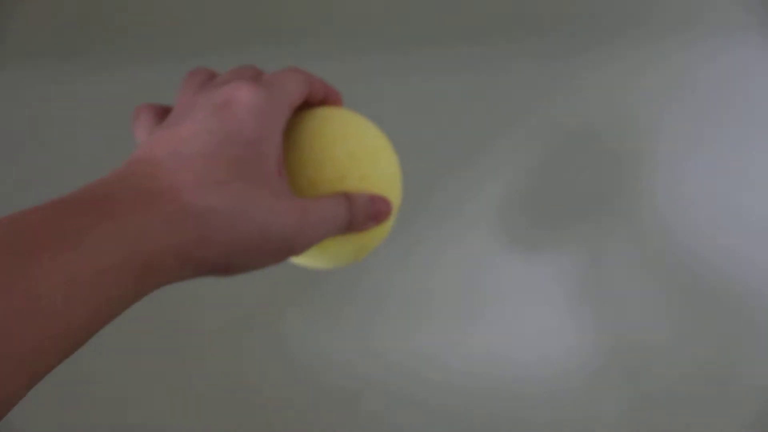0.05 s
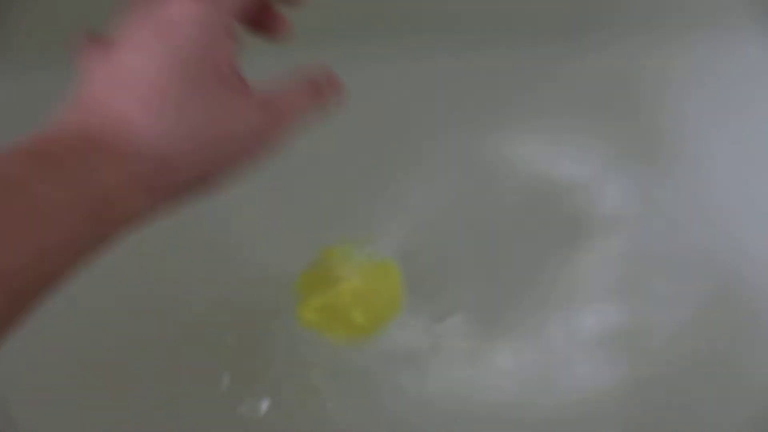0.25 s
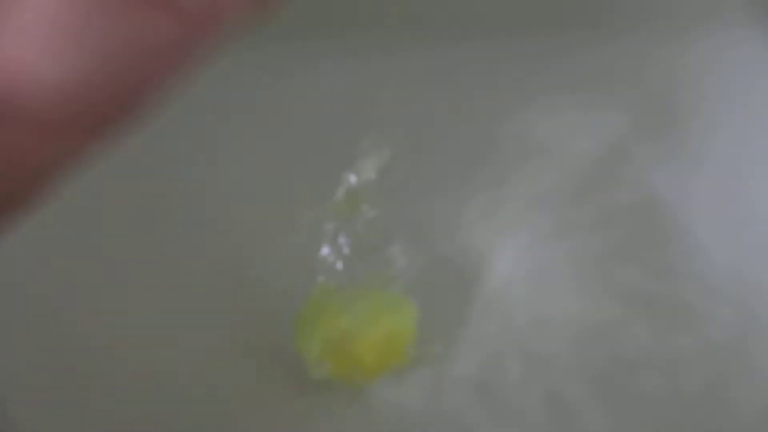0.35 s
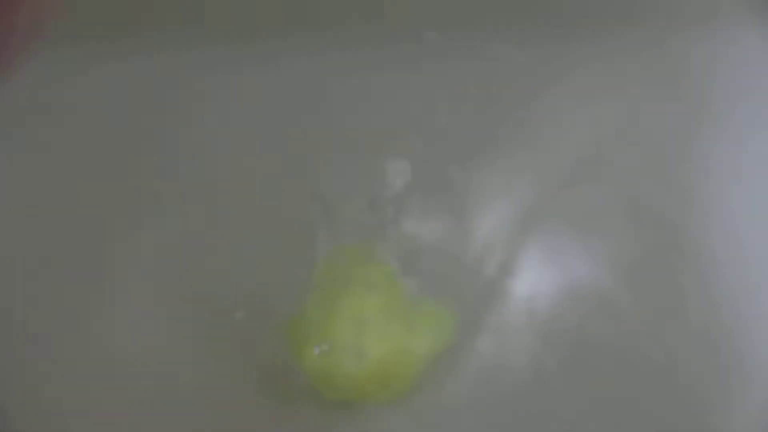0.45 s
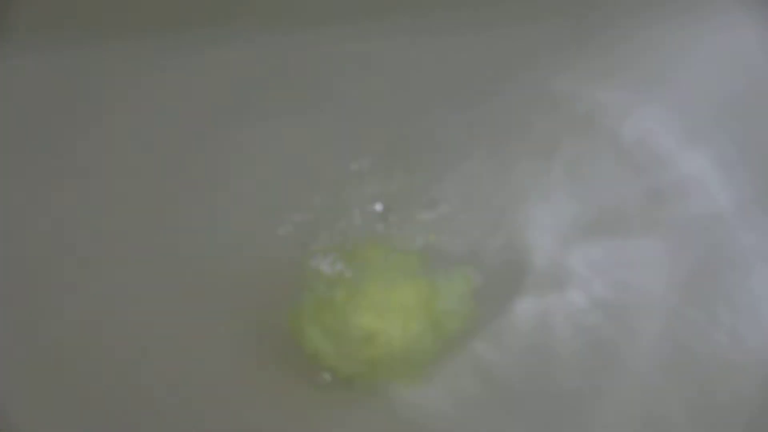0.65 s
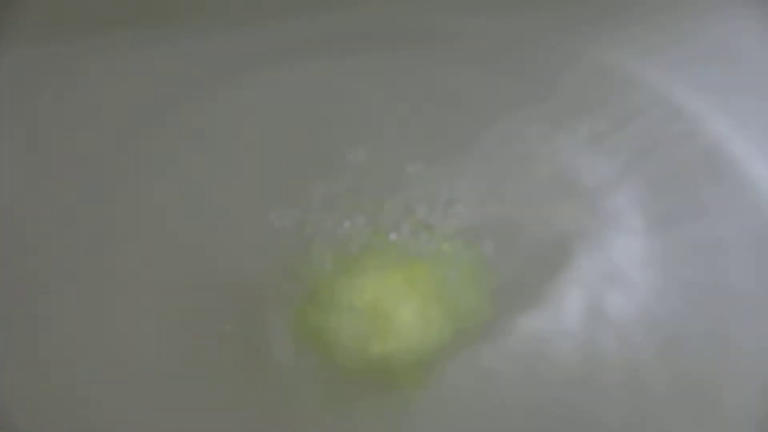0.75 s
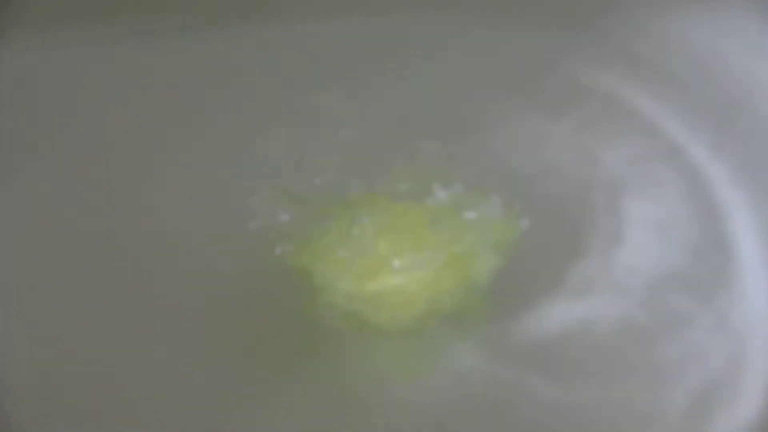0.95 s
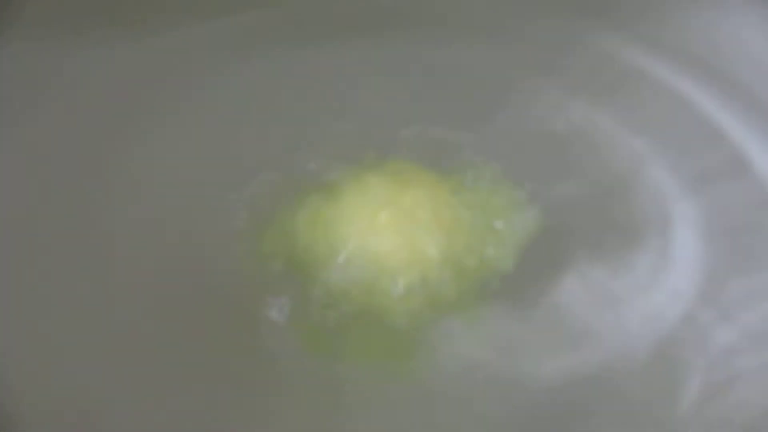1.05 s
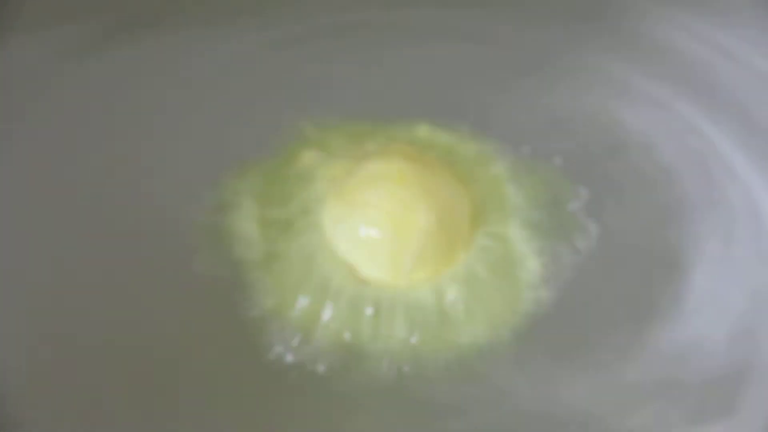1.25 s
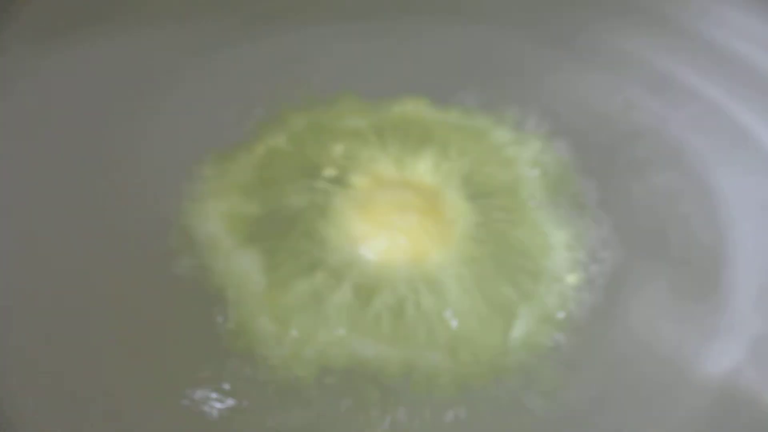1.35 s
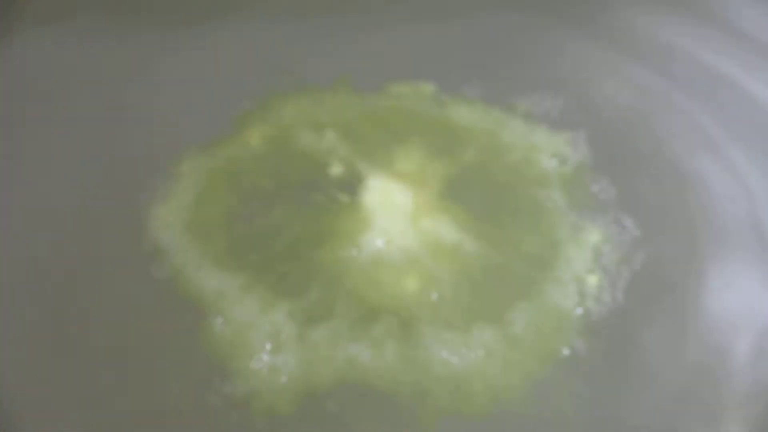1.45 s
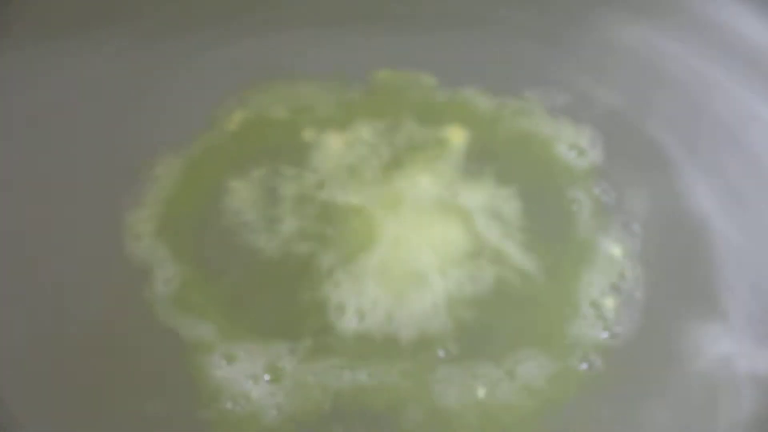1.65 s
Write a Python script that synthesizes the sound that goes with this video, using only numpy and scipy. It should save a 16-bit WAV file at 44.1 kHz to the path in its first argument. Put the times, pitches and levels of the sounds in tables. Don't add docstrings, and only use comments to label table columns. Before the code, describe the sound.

Close up in a tiled bathroom with faint fan hum and hiss, a sharp water slap, a low ringing thud on the tub floor, gurgles and tiny drips, then swelling fizz, snapping bubbles and one loud pop.

```python
import sys
import numpy as np
from scipy import signal
from scipy.fft import rfft, irfft, next_fast_len
from scipy.io import wavfile
from scipy.ndimage import map_coordinates

SR = 44100
rng = np.random.default_rng(int(sys.argv[2]) if len(sys.argv) > 2 else 0)


def level_to_linear(level):
    exponent = np.asarray(level, float) / 20
    return 10 ** exponent


def bounce(signal):
    frames = np.transpose(np.atleast_2d(signal))
    limited = np.clip(frames, -1, 1)
    pcm = np.round(limited * 32767).astype(np.int16)
    wavfile.write(sys.argv[1], SR, pcm)


N = 74970
T = np.arange(N) / SR


def unit(x):
    return x / np.sqrt(np.mean(x ** 2) + 1e-20)


def along(points, hz):
    f, v = np.transpose(points)
    return np.interp(np.log(hz + 1), np.log(f + 1), v)


def filtered(x, response):
    m = next_fast_len(len(x) + 8192)
    spectrum = rfft(x, m) * response(np.fft.rfftfreq(m, 1 / SR))
    return irfft(spectrum, m)[:len(x)]


def noise(colour):
    return unit(filtered(rng.standard_normal(N), lambda f: level_to_linear(along(colour, f))))


def band(hz, octaves):
    return lambda f: np.exp(-.5 * (np.log2((f + 1) / hz) / octaves) ** 2)


def peak(f, hz, width_hz):
    return 1j * f * width_hz / (hz * hz - f * f + 1j * f * width_hz)


def dying(start, t60, rise):
    t = np.maximum(T - start, 0)
    return level_to_linear(-60 * t / t60) * (1 - np.exp(-t / rise))


def add(x, s, sound):
    part = x[round(s * SR):][:len(sound)]
    part += sound[:len(part)]


def wander(width_hz):
    return np.cumsum(rng.standard_normal(N)) * np.sqrt(width_hz / SR)


def room_tone():
    # frequency in Hz, density in dB per Hz.
    hiss_colour = [(30, -4), (60, -1), (150, -2.5), (400, -2.5), (1000, -11), (3000, -14.5), (8000, -19.5),
                   (16000, -22.5)]
    # frequency in Hz, level in dB, width in Hz.
    fan_tones = [
        (58, -59, .5),
        (156, -72, 12),
    ]
    hiss_db = -58.5
    hum = 0
    for hz, db, width_hz in fan_tones:
        hum = hum + level_to_linear(db + 2) * np.sin(2 * np.pi * hz * T + wander(width_hz))
    return level_to_linear(hiss_db) * noise(hiss_colour) + hum


def bathroom(x, db):
    # frequency in Hz, t60 in seconds.
    tile_decay = [(150, 0.54), (800, 0.52), (2500, 0.32), (6000, 0.26), (15000, 0.14)]
    # delay in seconds, level in dB.
    wall_echoes = [(.0011, -19), (.0017, -18), (.0026, -15), (.0031, -17), (.0041, -21), (.0053, -24),
                   (.0063, -21), (.0083, -24), (.0137, -23), (.0153, -22)]
    hz, t, z = signal.stft(rng.standard_normal(SR), SR, nperseg=256)
    decay = level_to_linear(-60 * t / along(tile_decay, hz)[:, None])
    tail = signal.istft(z * decay, SR, nperseg=256)[1]
    tail *= 1 - np.exp(-np.arange(len(tail)) / SR / 0.011)
    tail *= level_to_linear(db) / np.linalg.norm(tail)
    tail[0] = 1
    for s, wall_db in wall_echoes:
        tail[round(s * SR)] += level_to_linear(wall_db)
    return signal.fftconvolve(x, tail)[:N]


def grains(count, hz, spread, cycles, spiky_db):
    r, k = rng.random((count, 2)), np.arange(160)
    f = np.clip(hz * np.exp(spread * rng.standard_normal((count, 1))), 200, 16000) / SR
    size = level_to_linear(-spiky_db * np.log(r[:, 1:] + .09))
    wave = size * np.exp(-k * f / cycles) * np.sin(2 * np.pi * f * k)
    moments = (r[:, :1] * N).astype(int) + k
    return unit(np.bincount(moments.ravel(), wave.ravel(), N + len(k))[:N])


def gushes():
    # start in seconds, swell in seconds, t60 in seconds, level in dB, centre in Hz.
    gush_rows = [(.016, 0.042, 0.23, -42.5, 4480), (0.015, 0.041, 0.16, -39.5, 12200),
                 (.156, 0.032, 0.56, -46, 1550), (.191, 0.022, 0.2, -46.5, 342),
                 (0.236, 0.0036, 0.32, -48.5, 490), (0.644, 0.034, 0.29, -55, 139),
                 (0.386, 0.011, 0.43, -36, 1920), (0.991, 0.041, 0.053, -40.5, 970),
                 (1.005, 0.012, 0.08, -42.5, 8800), (1.061, 0.016, 0.25, -50, 3600),
                 (1.091, 0.045, 0.52, -50.5, 944), (1.137, 0.016, 0.3, -39, 2600),
                 (1.165, 0.031, 0.15, -52.5, 140), (1.422, 0.0022, 0.4, -41, 840),
                 (1.4235, 0.007, 0.14, -36.5, 8000), (1.432, 0.013, 0.3, -50, 126),
                 (1.446, 0.014, 0.13, -36.5, 2620), (1.6, 0.04, 1, -47, 11000)]
    octaves, grain_share = 1, 0.61
    x = 0
    for s, swell, t60, db, hz in gush_rows:
        bubbling = grains(count=2500, hz=hz, spread=0.664, cycles=2.54, spiky_db=4.5)
        wet = rng.standard_normal(N) + grain_share * bubbling
        rise = np.sin(np.clip((T - s) / swell, 0, 1) * np.pi / 2) ** 2
        fall = level_to_linear(db - 60 * np.maximum(T - s - swell, 0) / t60)
        x = x + unit(filtered(wet, band(hz, octaves))) * rise * fall
    return x


def fizz():
    # time in seconds, level in dB.
    fizz_level = [
        (0, -53),
        (.3, -53.5),
        (.6, -66.5),
        (.95, -63),
        (1.0, -53),
        (1.13, -49.5),
        (1.2, -46),
        (1.4, -47),
        (1.55, -45.5),
        (1.7, -57.5),
    ]
    # frequency in Hz, density in dB per Hz.
    fizz_colour = [(500, 3), (1500, -2), (3000, -0.5), (4800, 3), (8000, -1.5), (13000, -2), (16000, -3)]
    bubbling = grains(count=5000, hz=6480, spread=0.453, cycles=1.9, spiky_db=5.0)
    hiss = unit(noise(fizz_colour) + .5 * bubbling)
    return hiss * level_to_linear(np.interp(T, *np.transpose(fizz_level)))


def bubbles():
    # start in seconds, peak in dB, pitch in Hz, life in cycles.
    bubble_rows = [(0.1766, -33, 2460, 10), (.1845, -34.5, 2493, 35), (.204, -30, 910, 10),
                   (0.2045, -33, 5700, 25), (0.224, -28, 1450, 5.4), (.2354, -0.5, 12600, 8),
                   (.2354, -33, 7500, 3.5), (1.1345, -15, 15100, 17), (1.4237, -20.5, 470, 1.5),
                   (0.693, -40.5, 6800, 22), (.715, -41.5, 4800, 9.9), (.76, -34, 5260, 10.8),
                   (.905, -39, 4200, 9.2), (0.9542, -43, 5800, 13), (1.009, -27.5, 5200, 5.7),
                   (1.026, -32, 6000, 5.2), (1.0345, -30, 504, 2.2), (1.02, -37, 650, 3.5),
                   (1.075, -46, 2160, 20), (1.0744, -39, 2820, 26), (1.083, -38, 4700, 13),
                   (1.1415, -32, 2310, 19), (1.161, -21.5, 5430, 17.3), (1.165, -27, 1480, 5.1),
                   (1.202, -23.5, 3500, 4.5), (1.424, 4, 4420, 5.5), (1.454, -25.5, 2540, 15),
                   (1.692, -44.5, 1920, 57)]
    rise, rise_hz = .05, 2000
    x, t = np.zeros(N), T[:SR // 10]
    for s, db, hz, cycles in bubble_rows:
        u = t * hz / cycles
        swell = 1.94 * level_to_linear(db - 38.0 * u ** 1.19) * (1 - np.exp(-t * hz * 0.93))
        bend = 1 + rise * (rise_hz / max(hz, rise_hz / 2)) ** 2 * np.minimum(u, 1) / 2
        add(x, s, swell * np.sin(2 * np.pi * hz * t * bend))
    return x


def snaps():
    # start in seconds, peak in
    # dB, centre in Hz, burst in seconds.
    snap_rows = [(0.16, -61, 9000, .003), (.1845, -50, 9000, .002), (.2, -36, 12000, 0.0026),
                 (.633, -45.5, 8500, 0.0035), (.639, -44, 14000, .004), (.692, -42, 9800, 0.0064),
                 (.713, -42, 11760, 0.0018), (.802, -46, 14000, 0.0032), (.855, -49, 13900, 0.004),
                 (0.937, -44.5, 9800, .003), (0.952, -37.5, 7650, .002), (.989, -45.5, 5930, 0.0016),
                 (.9925, -36, 11000, 0.0015), (.992, -41.5, 1010, 0.011), (1.018, -33, 10900, 0.0025),
                 (1.037, -48, 10500, .002), (1.1012, -30, 9000, 0.0032), (1.1343, -22, 14200, 0.0053),
                 (1.202, -31, 12000, .002), (1.275, -28, 13000, .002), (1.424, -15.5, 8980, 0.0069),
                 (1.546, -38, 11100, 0.0018), (1.461, -23, 5050, .004), (0.3772, -14.5, 9300, 0.0032)]
    octaves, lead = 0.4, 44
    x, t = np.zeros(N), T[:SR // 10]
    for s, db, hz, length in snap_rows:
        burst = rng.standard_normal(len(t)) * level_to_linear(-25 * t / length)
        burst[0] = 2.06
        burst = filtered(np.pad(burst, (lead, 0)), band(hz, octaves))
        add(x, s - lead / SR, level_to_linear(db) * burst / np.abs(burst).max())
    return x


def pockets(rows):
    softness, rough_db = 0.68, 2.5
    x = np.zeros(N)
    for s, length, db, start_hz, end_hz in rows:
        t = T[:round(length * SR)]
        flutter_db = rough_db * map_coordinates(rng.standard_normal(12), [t / length * 8])
        swell = level_to_linear(db + flutter_db) * np.abs(np.sin(np.pi * t / length)) ** softness
        glide_hz = start_hz + (end_hz - start_hz) * t / length / 2
        add(x, s, swell * np.sin(2 * np.pi * t * glide_hz))
    return x


def drips():
    # start in seconds, length in seconds, peak in dB, first pitch in Hz, last pitch in Hz.
    drip_rows = [(.177, .007, -40, 2480, 2480), (.188, .025, -42, 2500, 2480),
                 (.237, .004, -27, 3800, 6500), (.659, .01, -58, 3300, 2900), (.745, .04, -61, 1100, 1700),
                 (.858, .018, -43, 1180, 1530), (.859, .012, -51, 2250, 2400),
                 (.874, .028, -53, 2400, 2330), (.877, .008, -47, 1450, 1330),
                 (.883, .014, -52, 1750, 2050), (.887, .006, -48, 1450, 1550),
                 (.894, .008, -47, 1300, 1520), (.992, .008, -46, 950, 1100),
                 (1.037, .009, -44, 1250, 1300), (1.142, .006, -42, 3300, 3400),
                 (1.154, .006, -39, 2700, 2900), (1.1605, .005, -31, 7200, 6800),
                 (1.161, .007, -36, 3900, 4000), (1.162, .007, -38, 2900, 2700),
                 (1.187, .006, -42, 1100, 1200), (1.437, .004, -22, 4800, 4900)]
    return bathroom(pockets(drip_rows), db=-12.5)


def gulps():
    # start in seconds, length in seconds, peak in dB, first pitch in Hz, last pitch in Hz.
    gulp_rows = [(.392, .04, -20.5, 266, 274), (.394, 0.025, -20.5, 395, 368), (.41, 0.015, -22, 480, 493),
                 (.432, .017, -16.5, 402, 452), (.444, 0.021, -22.5, 360, 343),
                 (.464, 0.019, -19.5, 369, 390), (.458, .028, -29, 169, 165), (.498, 0.039, -31, 180, 169),
                 (.498, .012, -24, 328, 310), (.51, 0.025, -26.5, 348, 390), (.549, .014, -28, 380, 358),
                 (.556, 0.033, -35, 159.6, 160), (.57, 0.016, -31, 323, 343), (.622, .03, -43, 250, 337),
                 (.642, .066, -41, 125.6, 176.6), (.66, 0.019, -44.5, 343, 323),
                 (.7, .016, -48.5, 313, 300), (.722, 0.022, -46, 166, 170), (.81, 0.042, -52.5, 105, 110),
                 (.935, 0.037, -50.5, 159, 165), (1.031, .0065, -33, 696, 470), (.378, 0.031, -29, 97, 81),
                 (.3795, 0.013, -18.5, 858, 800)]
    return pockets(gulp_rows)


def slap():
    # frequency in Hz, density in dB per Hz.
    slap_colour = [(150, -15), (400, -13.5), (1500, -4), (3500, -3.5), (7500, -2), (10000, -7.5),
                   (12500, -15), (16000, -5)]
    start, crack_db, crack_t60 = .2352, -1, 0.015
    spray_db, spray_t60 = -12, 0.024
    x = level_to_linear(spray_db) * dying(start, spray_t60, 0.00014) * rng.standard_normal(N)
    cracks = start + np.array([0, .00012, .0003, .0004, .00055])
    strength = level_to_linear(crack_db - 60 * (cracks - start) / crack_t60)
    x[np.round(cracks * SR).astype(int)] += strength * [1, -1, 1, -1, 1]
    return filtered(x, lambda f: level_to_linear(along(slap_colour, f)))


KNOCK_S = .3797


def shell():
    # frequency in Hz, level in dB, t60 in seconds.
    shell_modes = [(106.3, -21, 0.58), (165, -11, 0.61), (269.8, -6.5, 0.5), (346.3, -5, 0.46),
                   (394, -7, 0.4), (426.3, 1, 0.18), (470.8, -5, 0.33), (507, -8, 0.35), (748.6, -16, 0.37),
                   (822, -1.5, 0.078), (945, -10.5, 0.16), (1390, -20.5, 0.3), (425, 5, 0.06)]
    level_db, rise_s, shimmer_hz = -16, 0.00045, 31.8
    gurgle_db, gurgle_hz = 2.5, 30
    t = np.maximum(T - KNOCK_S, 0)
    ring = np.zeros(N)
    for hz, db, t60 in shell_modes:
        lumps = map_coordinates(rng.standard_normal(200), [T * gurgle_hz])
        lumps *= np.clip(t * gurgle_hz, 0, 1)
        steps = rng.standard_normal(N) * (t > .006)
        drift = np.cumsum(steps) * np.sqrt(shimmer_hz / SR)
        ring -= level_to_linear(db + gurgle_db * lumps - 60 * t / t60) * np.sin(2 * np.pi * hz * t + drift)
    return level_to_linear(level_db) * ring * (1 - np.exp(-t / rise_s))


def rattle():
    # frequency in Hz, density in dB per Hz.
    rattle_colour = [(40, -65), (80, -24.5), (420, 5), (620, -15.5), (850, -10), (4280, -20), (5500, -29.5),
                     (16000, -34.5)]
    touch = level_to_linear(-19) * dying(.3768, 0.086, 0.00055)
    blow = level_to_linear(-14) * dying(KNOCK_S, 0.098, 0.00035)
    return bathroom(noise(rattle_colour) * (touch + blow), db=-9)


def boom():
    # frequency in Hz, width in Hz, level in dB.
    tub_modes = [(96, 20, 3.5), (160.7, 29.6, 5.5), (264, 32, 1), (367, 100, -10)]

    def response(f):
        return sum(level_to_linear(db) * peak(f, hz, w) ** 2 for hz, w, db in tub_modes)

    body = unit(filtered(rng.standard_normal(N), response))
    return level_to_linear(-28.5) * body * dying(KNOCK_S, 0.81, 0.0034)


def metal_tap():
    hz, db, t60 = 670, -52.5, 2.8
    t = np.maximum(T - KNOCK_S, 0)
    return level_to_linear(db - 60 * t / t60) * np.sin(2 * np.pi * hz * t)


def knock():
    x = shell() + rattle() + boom() + metal_tap()
    return signal.sosfilt(signal.butter(4, 80, "high", fs=SR, output="sos"), x)


def scene():
    surface = bubbles() + snaps() + slap()
    wet = sum(bathroom(surface * (T // .3 == k), db=-10) for k in range(6))
    x = room_tone() + fizz() + gushes() + wet
    return (x + drips() + gulps() + knock())[None]


def roll_off(x):
    return signal.sosfilt(signal.butter(12, 16850, fs=SR, output="sos"), x)


def record(dry):
    ceiling, knee, bass_hz, top_hz = .78, 4, 50, 15950
    x = dry[0] / (1 + np.abs(dry[0] / ceiling) ** knee) ** (1 / knee)
    x = filtered(x, lambda f: (f < top_hz) / np.sqrt(1 + (bass_hz / (f + 1)) ** 14))
    return roll_off(x[None])


dry = scene()
out = record(dry)
bounce(out)
```